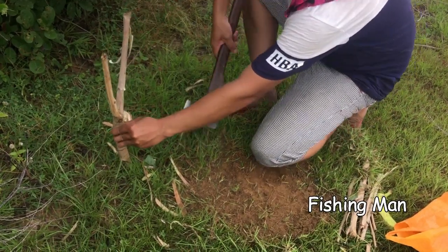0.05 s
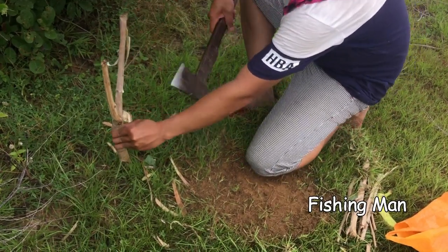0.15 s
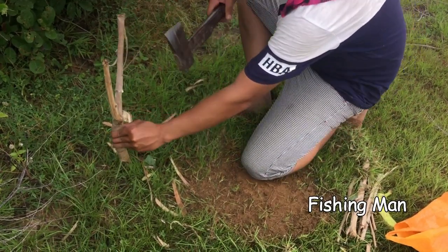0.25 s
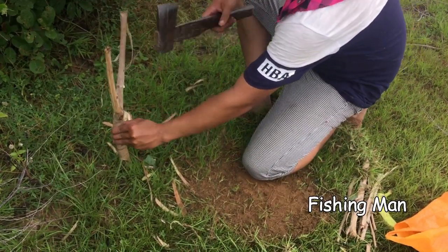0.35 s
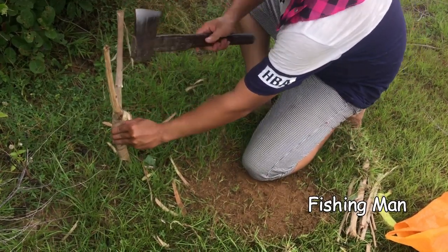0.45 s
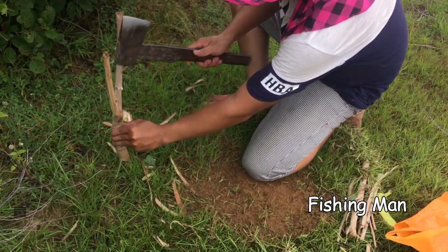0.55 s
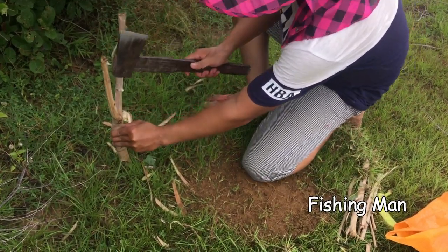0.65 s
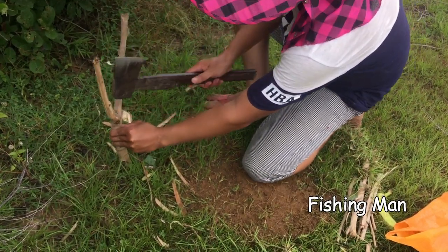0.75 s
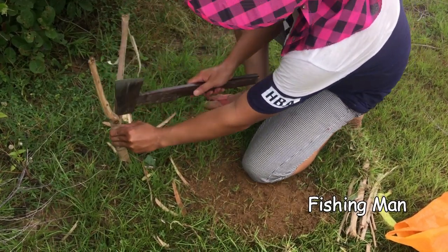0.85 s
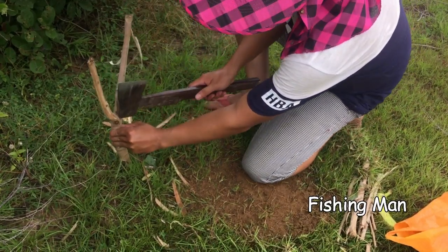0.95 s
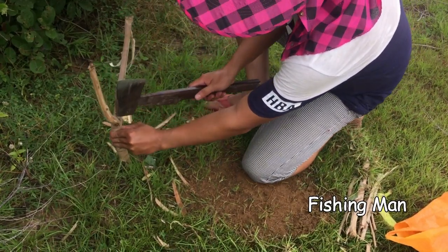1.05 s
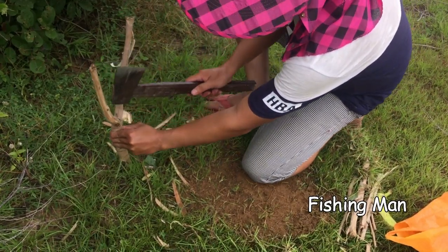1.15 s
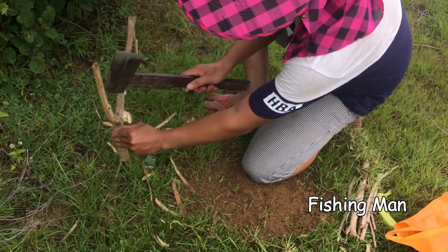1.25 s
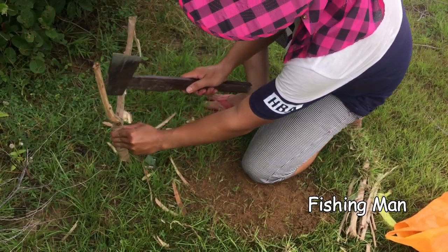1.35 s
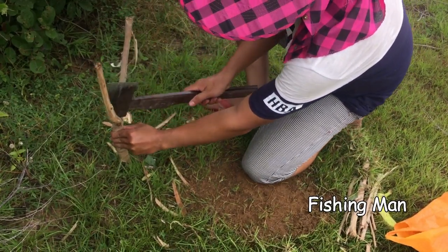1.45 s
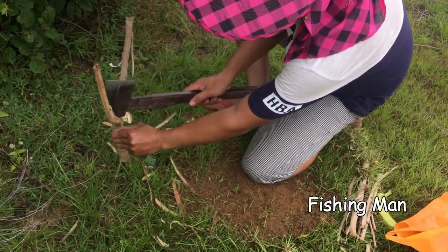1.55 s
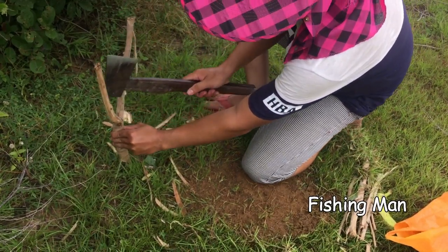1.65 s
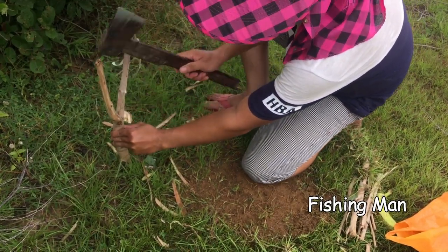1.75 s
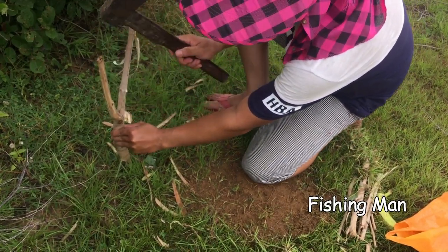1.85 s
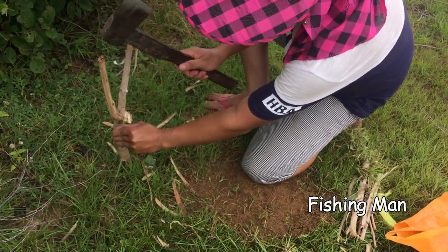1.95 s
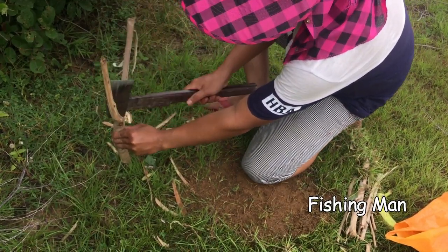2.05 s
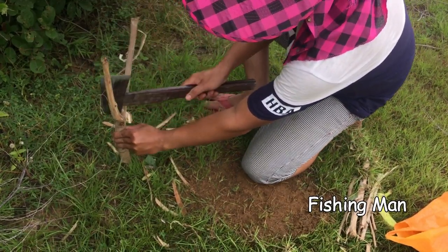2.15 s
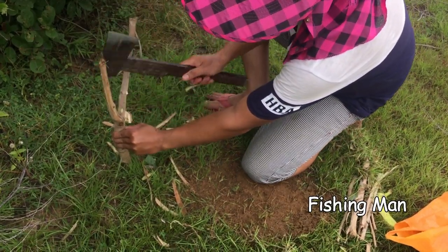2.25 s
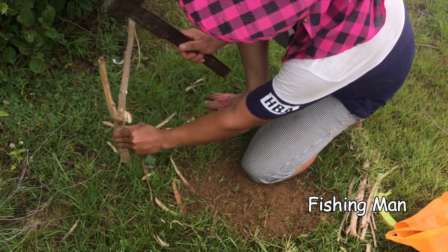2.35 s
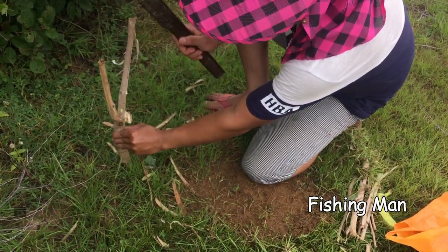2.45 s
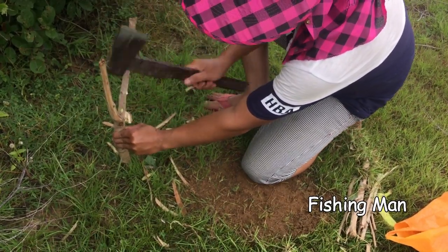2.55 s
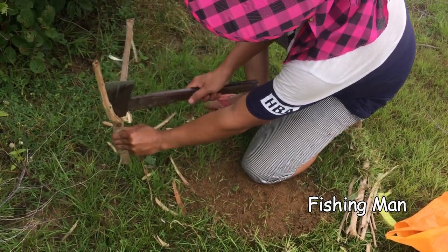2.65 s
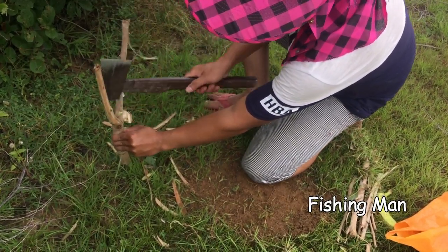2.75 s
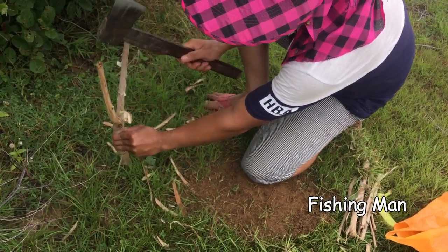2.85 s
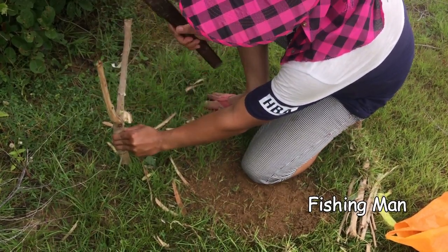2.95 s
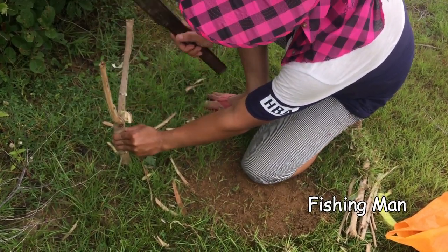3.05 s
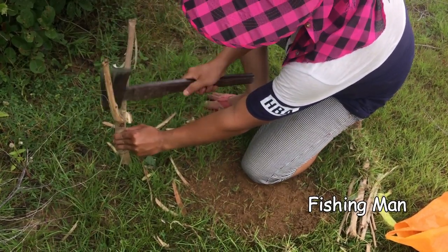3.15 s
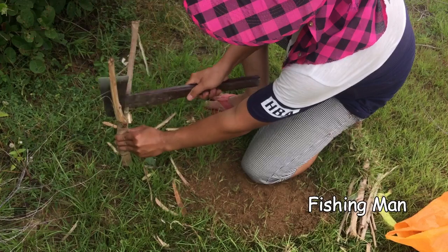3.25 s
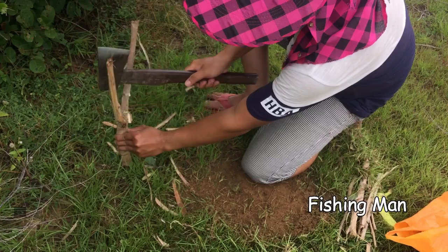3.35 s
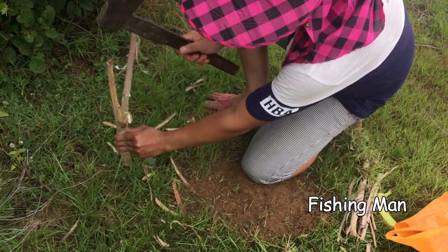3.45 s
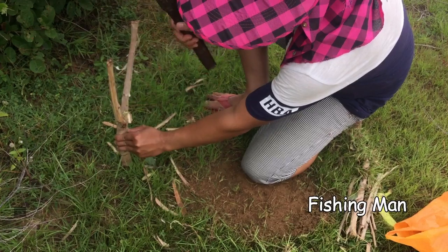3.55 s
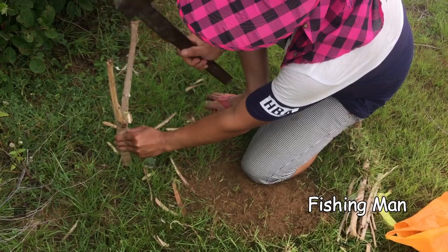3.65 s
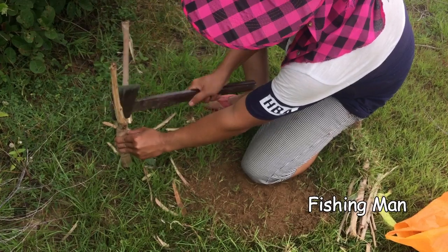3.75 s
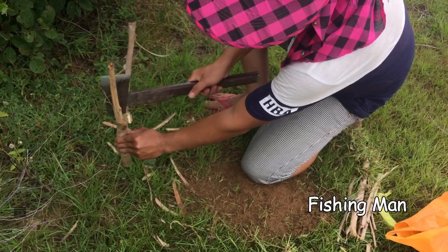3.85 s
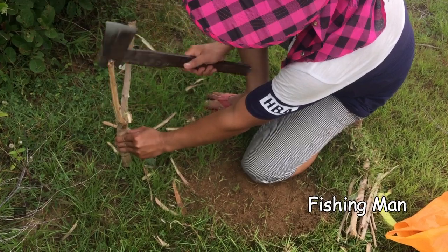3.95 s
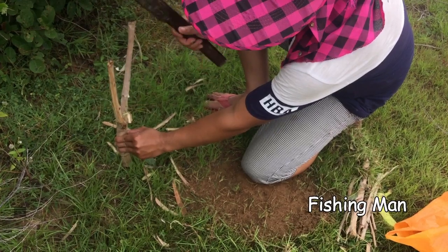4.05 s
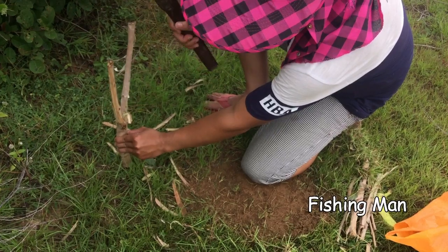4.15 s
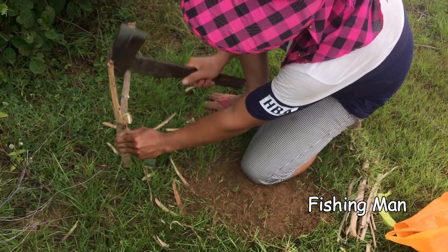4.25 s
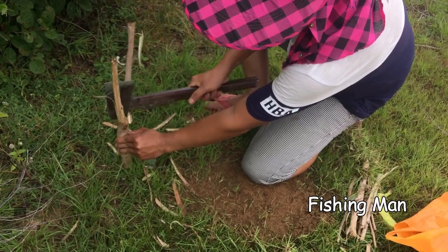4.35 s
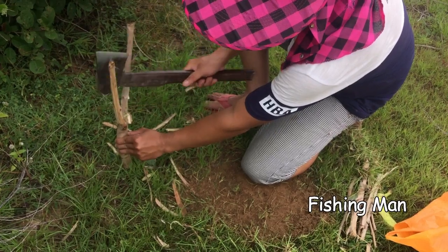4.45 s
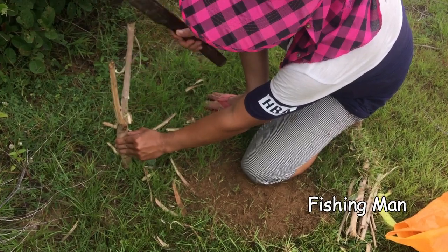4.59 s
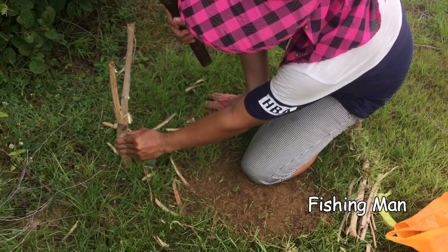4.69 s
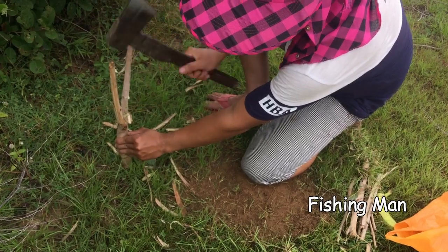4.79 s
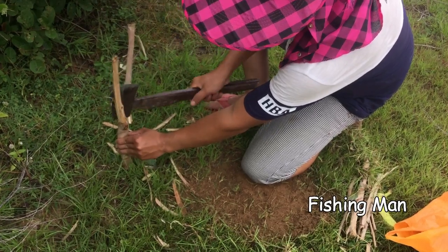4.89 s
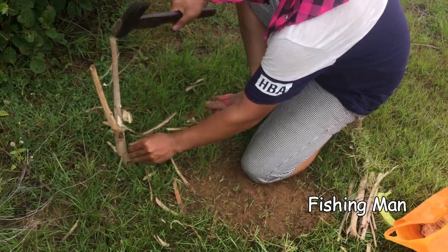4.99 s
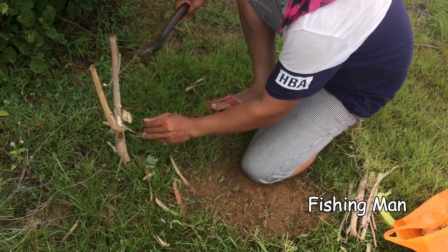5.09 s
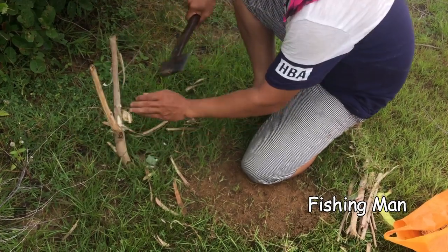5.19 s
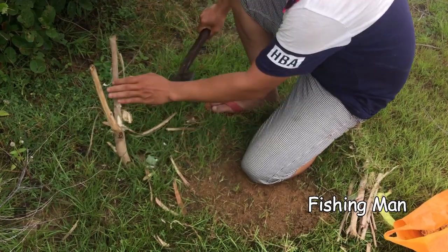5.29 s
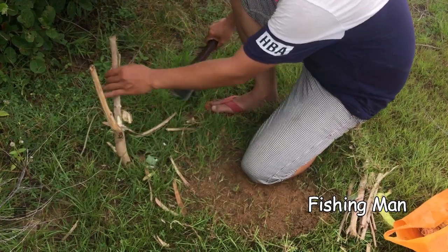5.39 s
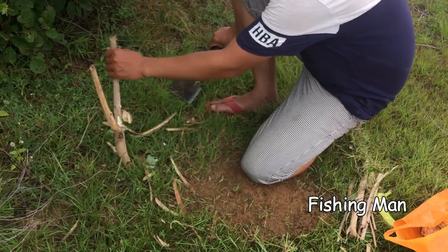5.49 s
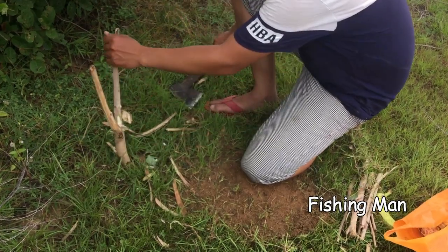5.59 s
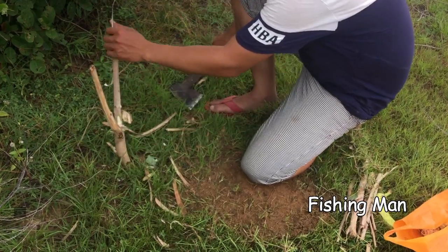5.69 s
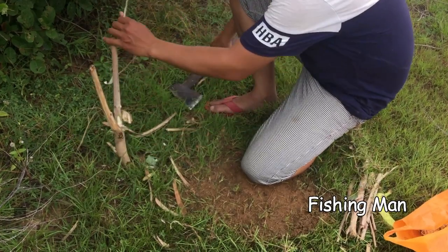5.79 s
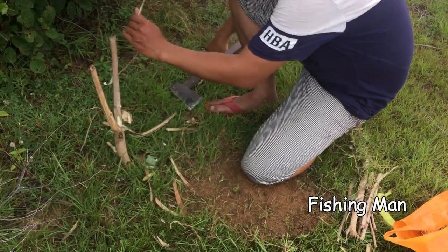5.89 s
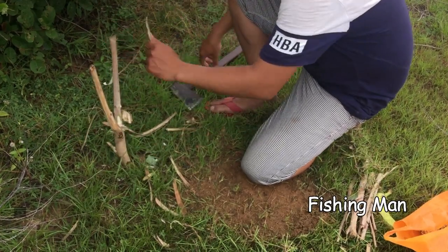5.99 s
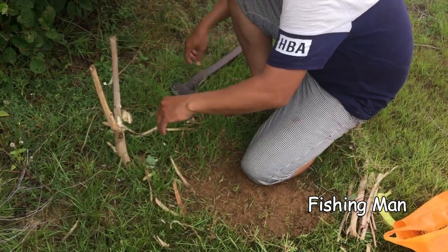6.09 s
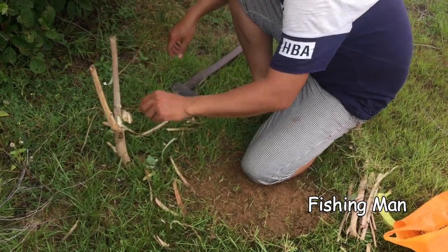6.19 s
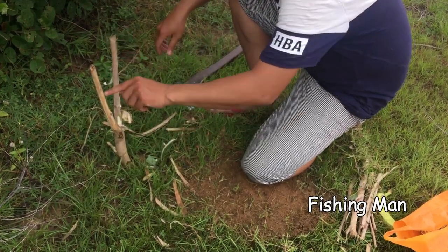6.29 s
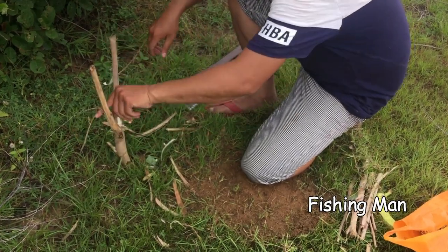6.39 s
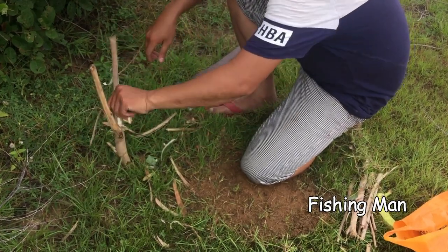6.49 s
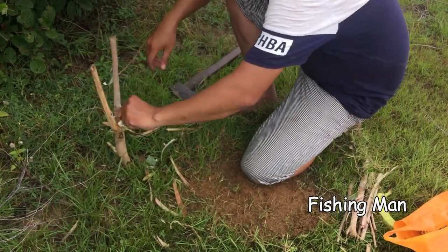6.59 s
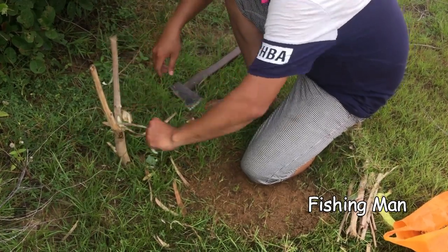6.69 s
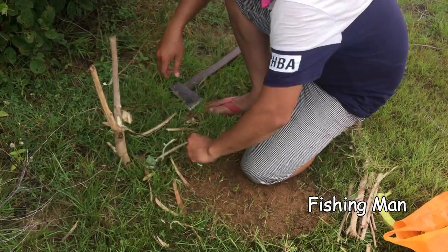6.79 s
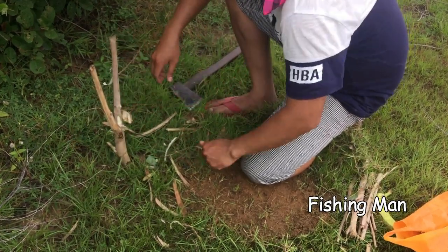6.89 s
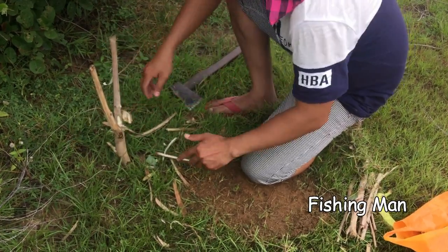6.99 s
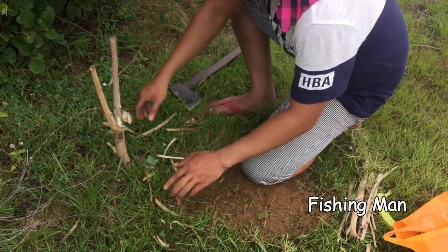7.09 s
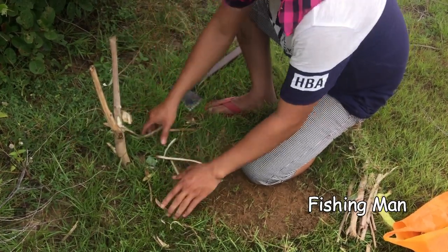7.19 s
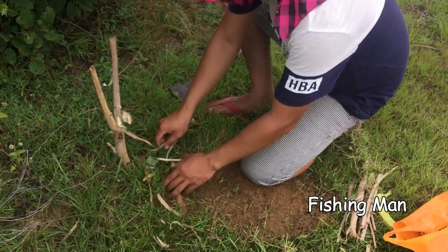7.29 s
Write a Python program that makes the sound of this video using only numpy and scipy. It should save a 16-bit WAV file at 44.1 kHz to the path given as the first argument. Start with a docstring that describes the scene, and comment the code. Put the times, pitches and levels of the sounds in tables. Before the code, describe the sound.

An open field heard through a small, close mono microphone, with a soft hush of distant leaves and a barely audible wavering drone. Wind pushes on the microphone throughout in uneven low thumps and flutter. In the first 0.5 seconds bark and grass scrape and twigs tick, one tick sharper near 0.4. Then a hatchet chops a thin green stake seven times at a steady pace: a weak tap at 1.5, then stronger blows at 2.1, 2.7, 3.2, 3.8, 4.4 and 4.9. Each is a bright, very short steel ring with a woody knock, splintering crack, low thud into soil and a brief scatter of chips; later blows knock harder. A bare click and rustle follow at 5.0. Faint raspy bird notes come from 5.2 to 5.9, with a big gust at 5.8. Dry grass crackles around 6.7, and rustling and wind return near 7.2.

```python
"""Wind slaps a small microphone while grass and bark rustle and twigs tick; then seven hatchet chops ring out.
Place: open fields with a soft hush and a faint drone; a thin green stake stands upright in grass, close by.
Wind, hush and drone are shaped noise, and single gusts are short low waves; rustles are clumped snaps.
A small bird's notes are sagging sines; ticks and a click are short pings with noise.
Each chop sums dying steel and stake modes with a thud and noise bursts.
"""
import sys
import numpy as np
from scipy import signal
from scipy.fft import rfft, irfft, next_fast_len
from scipy.io import wavfile
from scipy.ndimage import uniform_filter1d

SR = 44100
rng = np.random.default_rng(int(sys.argv[2]) if len(sys.argv) > 2 else 0)


def put_to_file(sound):
    """Save the sound as 16-bit audio at rate SR, in the file named by the first command-line argument."""
    columns = np.atleast_2d(sound).T  # one column per channel
    safe = np.clip(columns, -1, 1)
    whole_steps = np.round(safe * 32767)
    wavfile.write(sys.argv[1], SR, whole_steps.astype(np.int16))


N = 323253  # samples


def gain_of(db):
    """Decibels to gain."""
    return 10 ** (np.asarray(db) / 20)


def evened(x):
    """Scales to rms 1."""
    return x / np.sqrt(np.mean(x ** 2) + 1e-20)


def noise(size):
    """White noise."""
    return rng.standard_normal(size)


def smoothed(x, size):
    """Running mean over size samples, brought to rms 1."""
    return evened(uniform_filter1d(x, size))


def lumps(width_s):
    """Slow chance of rms 1 that holds for about width_s."""
    size = max(round(width_s * SR), 2)
    return smoothed(uniform_filter1d(noise(N), size), size)


def coloured(x, spectrum):
    """Filters x by a curve of (f/Hz, level/dB), straight over log frequency, and brings it to rms 1."""
    f, db = np.transpose(spectrum)
    size = next_fast_len(len(x))
    hz = np.fft.rfftfreq(size, 1 / SR)
    curve_db = np.interp(np.log(hz + 1), np.log(f + 1), db)
    return evened(irfft(rfft(x, size) * gain_of(curve_db), size)[:len(x)])


def level_over_time(table):
    """Joins points of (t/s, level/dB) by straight lines over the whole scene."""
    s, db = np.transpose(table)
    return np.interp(np.arange(N) / SR, s, db)


def add(mix, s, sound):
    """Mixes a sound in at s seconds."""
    part = mix[round(s * SR):][:len(sound)]
    part += sound[:len(part)]


# level of the faint far drone as it comes and goes: [t/s, level/dB]
DRONE_LEVEL = [(0, -76), (.4, -82), (1.0, -73), (1.499, -70), (2.0, -81.5), (3.0, -80), (3.8, -75),
               (4.7, -76.5), (5.2, -85.5), (7.33, -100)]
# narrow band of the drone: [f/Hz, relative level/dB per Hz]
DRONE_SPECTRUM = [(1400, -39.5), (1620, 1), (1720, 0), (1820, -6), (2100, -40)]


def drone():
    """A far, narrow, wavering band of noise."""
    wavering_db = level_over_time(DRONE_LEVEL) + 1.3 * lumps(0.11)
    return gain_of(wavering_db) * coloured(noise(N), DRONE_SPECTRUM)


# spectrum of distant leaves and fields: [f/Hz, relative level/dB per Hz]
HUSH_SPECTRUM = [(150, -28.5), (250, -3), (622, -3), (768, -7.5), (1170, -7.5), (4060, -19), (4840, -22),
                 (5870, -21), (8780, -25), (10500, -28), (13400, -25.5), (15700, -30), (16500, -47.5)]
# level of the hush: [t/s, rms level/dB]
HUSH_LEVELS = [(0, -59.5), (.6, -64.5), (1.3, -63.5), (3.8, -64), (5.3, -65.5), (7.33, -66.5)]


def hush():
    """The steady wash of distant leaves and fields: noise whose level drifts slowly."""
    wash = coloured(noise(N), HUSH_SPECTRUM)
    low_cut = signal.butter(2, 250, "high", fs=SR, output="sos")  # the wind owns the bass
    return gain_of(level_over_time(HUSH_LEVELS)) * evened(signal.sosfilt(low_cut, wash))


# single gusts that slap the microphone: [t/s, peak level/dB, nominal f/Hz]
GUSTS = [(0.136, -39, 70), (0.368, -33.5, 71), (0.464, -27, 122), (0.554, -39, 105), (0.625, -39, 93.5),
         (0.731, -26.5, 65), (0.792, -24.5, 73), (0.882, -27.5, 108), (0.908, -28, 204), (0.968, -29, 112),
         (1.038, -27.5, 107), (1.108, -29, 61), (1.214, -33, 129), (1.402, -29, 95), (1.454, -32, 75),
         (1.574, -26.5, 69), (1.697, -33.5, 72.4), (1.88, -27.5, 83.4), (1.999, -36, 65), (2.17, -32, 85),
         (2.396, -35, 71), (2.772, -46, 69.3), (2.854, -30, 72.4), (2.945, -35, 65.2), (3.011, -26.5, 99),
         (3.153, -20.5, 84), (3.338, -23, 102), (3.409, -38, 70.5), (3.492, -22, 128), (3.607, -32, 112),
         (3.682, -28, 119.6), (3.725, -34, 72.7), (3.912, -28.5, 59.5), (4.03, -31, 73), (4.144, -27, 218),
         (4.198, -24, 96), (4.253, -34, 87), (4.484, -24, 137), (4.565, -25, 63.9), (4.697, -32, 96.6),
         (4.819, -27, 102), (4.858, -31, 81), (5.012, -31, 76.5), (5.167, -33.5, 86.3),
         (5.258, -39.5, 65.4), (5.4, -29, 164), (5.445, -23, 80), (5.546, -33.5, 143), (5.798, -20.5, 79),
         (6.201, -48, 71.7), (6.497, -34, 80), (6.606, -28.5, 92.4), (7.157, -27.5, 110.5),
         (7.222, -38.5, 71), (7.278, -35.5, 83.6)]


def buffet(db, hz):
    """A push of air on the microphone: about two low cycles that slow down as they fade."""
    turns = np.arange(0, 2.6, hz / SR)
    shape = (1 - np.exp(-turns / 0.2)) ** 2 * np.exp(-turns / 0.74)
    shape = shape * signal.windows.tukey(len(turns), .25)
    direction = rng.choice([-1, 1])
    return gain_of(db) * direction * np.sin(2 * np.pi * turns ** 0.95) * shape / shape.max()


# wind under the single gusts: [t/s, rumble level/dB, added flutter level/dB]
WIND_STRENGTH = [(0.0, -24.5, -0.5), (0.08, -55, -5), (0.24, -34.5, 3), (0.3, -58.5, 8), (0.47, -39.5, 1.5),
                 (0.62, -30.5, -6.5), (0.7, -45, 2.5), (1.0, -33.5, -1), (1.2, -41, -2.5),
                 (1.29, -49.5, -4), (1.42, -29, -10), (1.65, -43.5, -2), (1.9, -35.5, 2.5), (1.96, -53, -4),
                 (2.03, -35.5, -8.5), (2.25, -45, 2.5), (2.33, -54, 4), (2.43, -34, -4), (2.55, -54, 2),
                 (3.02, -38.5, -1), (3.12, -46.5, -8), (3.3, -46.5, 0.5), (3.5, -36, 0.5),
                 (3.9, -44.5, 3.5), (4.33, -45.5, 2.5), (4.57, -38, -0.5), (4.92, -35, -1),
                 (5.12, -50, -1.5), (5.36, -49, -2.5), (5.5, -40.5, 7.5), (5.69, -57, 1), (5.78, -41, -2.5),
                 (5.9, -58.5, 0), (6.35, -49, -7.5), (6.45, -50, -6.5), (7.1, -46.5, -4.5),
                 (7.33, -37, -1.5)]
# low rumble of wind at the microphone: [f/Hz, relative level/dB per Hz]
RUMBLE_SPECTRUM = [(12, -58), (20, -20), (41, 2), (65, 5.5), (119, -1.5), (250, -24.5), (320, -48),
                   (550, -120)]
# higher flutter, also the colour of shaken soil: [f/Hz, relative level/dB per Hz]
FLUTTER_SPECTRUM = [(80, -31), (130, 0), (200, 0), (300, -6.5), (450, -21), (700, -62)]
FLUTTER_DB, FLUTTER_FOLLOW = -58.5, 1.4  # flutter at a rumble of -45 dB, and dB of flutter per dB of rumble
STIR_RISE_S, STIR_T60_S = 0.0044, 0.18
STIR_RUMBLE_DB, STIR_FLUTTER_DB = -7.5, -15  # against the gust's peak
STIR_DB_PER_OCTAVE = 6.5  # higher gusts flutter more


def wind():
    """Lumpy low noise; quick eddies add a higher flutter, and each gust stirs both with dying turbulence."""
    s, *columns = np.transpose(WIND_STRENGTH)
    strength_db, bright_db = (np.interp(np.arange(N) / SR, s, c) for c in columns)
    rumble_gain = gain_of(strength_db)
    flutter_gain = gain_of(FLUTTER_DB + FLUTTER_FOLLOW * (strength_db + 45))
    t = np.arange(SR // 3) / SR
    stir = np.minimum(t / STIR_RISE_S, 1) * gain_of(-60 * t / STIR_T60_S)
    for start, peak_db, hz in GUSTS:
        pitch_db = STIR_DB_PER_OCTAVE * np.log2(hz / 100)
        add(rumble_gain, start, gain_of(peak_db + STIR_RUMBLE_DB) * stir)
        add(flutter_gain, start, gain_of(peak_db + STIR_FLUTTER_DB + pitch_db) * stir)
    eddies = lumps(0.012)
    rumble = evened(coloured(noise(N), RUMBLE_SPECTRUM) * gain_of(4.2 * eddies))
    flutter = coloured(noise(N) * gain_of(5.3 * eddies), FLUTTER_SPECTRUM)
    return rumble_gain * rumble + gain_of(bright_db) * flutter_gain * flutter


# bird notes: [t/s, nominal peak level/dB, mid-note f/Hz, length/s, fall as a share of pitch]
BIRD_NOTES = [(5.228, -71, 5130, 0.028, .01), (5.24, -67.5, 3410, 0.058, 0.0089),
              (5.258, -69, 5670, 0.04, 0.011), (5.30, -70.5, 5070, 0.017, .01),
              (5.357, -69.5, 3420, 0.043, 0.0093), (5.39, -66, 2540, 0.017, .01),
              (5.453, -61, 4800, 0.034, 0.017), (5.4755, -59, 4760, 0.048, 0.03),
              (5.646, -58.5, 4570, 0.035, 0.049), (5.669, -55, 4520, 0.031, 0.038),
              (5.693, -56.5, 4460, 0.025, 0.06), (5.855, -61.5, 4580, 0.032, 0.041),
              (5.877, -58.5, 4520, 0.04, 0.07), (5.902, -66, 4640, 0.033, 0.031)]


def chirp(db, hz, length, fall):
    """A short raspy note: a sagging sine with a wobble in pitch and level."""
    t = np.arange(0, max(length, .005), 1 / SR)
    wobble, rasp = (smoothed(noise(len(t)), 50) for _ in range(2))
    slide = hz * (1 + fall * (.5 - t / t[-1] + 0.48 * wobble))
    swell = np.sin(np.pi * np.sqrt(t / t[-1])) ** 2  # rises faster than it falls
    return gain_of(db) * np.sin(2 * np.pi * np.cumsum(slide) / SR) * (1 + .5 * rasp) * swell


# hands and feet in grass and bark: [t/s, swell/s, fade/s, scrape level/dB, dry hiss level/dB]
RUSTLE_STROKES = [(0.0, 0.0059, 0.029, -81, -86), (0.03, 0.096, 0.028, -52.5, -66),
                  (0.12, 0.1, .09, -50, -60), (0.37, 0.01, 0.031, -54.5, -78),
                  (0.82, 0.059, 0.042, -65, -76), (4.99, 0.081, 0.075, -54.5, -62),
                  (5.37, 0.059, 0.075, -64, -61.5), (5.47, .11, .25, -75, -68.5),
                  (5.6, .23, 0.16, -72, -67), (6.56, 0.099, 0.086, -81, -62.5),
                  (6.678, 0.022, .014, -69.5, -51), (6.708, .011, 0.013, -77, -44.5),
                  (7.19, 0.14, 0.038, -64.5, -59)]
# scraped stalks and bark: [f/Hz, relative level/dB per Hz]
SCRAPE_SPECTRUM = [(600, -52), (1000, 5.5), (2500, 13.5), (4000, 11), (6000, -4), (9000, -55)]
# dry blades: [f/Hz, relative level/dB per Hz]
DRY_SPECTRUM = [(2500, -21), (5000, -0.5), (7500, 3.5), (10500, 1.5), (13500, 3.5), (16500, -2.5)]
RUSTLE_DEPTH_DB = 18.5  # how far below its peak the stroke starts and ends, before the edges are tapered
SNAPS_PER_S = 300  # mean rate at each pitch


def rustle(swell, fade, scrape_db, dry_db):
    """Small pitched snaps in clumps for the scrape, a finer grain for the dry blades."""
    t = np.arange(0, swell + fade, 1 / SR)
    size = len(t)
    stroke = gain_of(np.interp(t, [0, swell, swell + fade], [-RUSTLE_DEPTH_DB, 0, -RUSTLE_DEPTH_DB]))
    fine = noise(size)
    grain_t = np.arange(SR // 100) / SR
    clumps = smoothed(noise(size), 250)
    snaps = 0.18 * fine
    for hz in np.geomspace(900, 5500, num=14):  # each stalk or flake of bark snaps at its own pitch
        strength = gain_of(0.96 * np.minimum(rng.exponential(1, size), 4))
        strikes = strength * (rng.random(size) < SNAPS_PER_S / SR)
        grain = np.sin(2 * np.pi * hz * grain_t) * np.exp(-grain_t * hz / 0.88)
        snaps = snaps + signal.oaconvolve(strikes, grain)[:size] * np.sqrt(hz / SR)
    scrape = coloured(snaps * gain_of(2.5 * clumps), SCRAPE_SPECTRUM)
    dry_hiss = coloured(fine * gain_of(1.5 * clumps), DRY_SPECTRUM)
    mixed = gain_of(scrape_db) * scrape + gain_of(dry_db) * dry_hiss
    return mixed * stroke * signal.windows.tukey(size, .3)


# short ticks of twigs and landing chips, except the one at 4.98 s, which is heard as a bare click:
# [t/s, ping level/dB, ping f/Hz, snap level/dB, t60/s]
TICKS_AND_CLICK = [(0.0473, -48, 1070, -76, 0.023), (0.121, -45, 1100, -53, 0.019),
                   (0.1281, -42.5, 1050, -64, 0.034), (0.1955, -53, 2850, -52, 0.011),
                   (0.3594, -50, 2020, -53, 0.011), (0.281, -66, 2000, -53, 0.008),
                   (0.3818, -30.5, 1710, -39.5, 0.0057), (0.8723, -56, 1340, -65, 0.01),
                   (0.9105, -66, 902, -53, 0.01), (2.6912, -42, 1680, -44.5, 0.008),
                   (3.6857, -58, 1110, -70, 0.01), (3.8297, -47.5, 2820, -58, 0.012),
                   (4.3904, -32.5, 890, -46.5, 0.0051), (4.487, -49.5, 935, -68.5, 0.01),
                   (4.9823, -40.5, 1058, -47.5, 0.007), (5.4335, -46.5, 2900, -43, 0.026),
                   (6.6921, -48, 1906, -39.5, 0.0087), (6.7196, -67, 1096, -46.5, 0.0085),
                   (6.7617, -54, 1280, -57, 0.016)]
# noise of the snap: [f/Hz, relative level/dB per Hz]
SNAP_SPECTRUM = [(500, -23.5), (1500, -10.5), (4000, -0.5), (8000, 1.5), (11000, -10), (16500, 0)]


def tick(db, hz, snap_db, t60):
    """A short ping with a wide snap of noise, both dying together."""
    t = np.arange(SR // 30) / SR
    ping = gain_of(db) * np.sin(2 * np.pi * hz * t)
    snap = gain_of(snap_db) * coloured(noise(len(t)), SNAP_SPECTRUM)
    return (ping + snap) * gain_of(-60 * t / max(t60, .002))


def ring(modes, t, length, cycles, favoured_hz, slope_db, snap):
    """Dying modes; each swells over some cycles, highs first, and loses a share at once while the edge is gripped."""
    out = np.zeros(len(t))
    for hz, db, t60 in modes:
        luck_db, detune = 1.5 * noise(None), 0.0078 * noise(None)
        reach_db = db + luck_db - slope_db * np.log2(hz / favoured_hz) ** 2
        swell = (1 - np.exp(-t * hz / cycles)) ** 2
        gripped = 1 + snap * np.exp(-t / 0.00055)
        fade = gain_of(reach_db - 60 * t / (t60 * length))
        out += fade * swell * gripped * np.sin(2 * np.pi * hz * (1 + detune) * t)
    return out / abs(out).max()


# steel meeting wood in seven chops; in four the edge bites and then the head seats: [t/s,
# steel ring peak level/dB, steel ring length factor, f/Hz the ring favours, wood knock peak level/dB,
# f/Hz the knock favours, thud level/dB, thud settling f/Hz, crack level/dB, scatter level/dB]
HATCHET_CONTACTS = [(1.509, -32, 1.5, 4640, -47, 2000, -27, 170, -29.5, -52),
                    (2.1086, -14, 0.76, 4900, -18, 1800, -20, 228, -22, -40.5),
                    (2.6597, -23, 1.6, 4640, -29.5, 2000, -40.5, 198, -28, -69),
                    (2.6636, -7, 0.52, 4500, -15, 2170, -14.5, 205, -20, -39.5),
                    (3.2375, -16, .6, 4300, -14, 1580, -13.5, 210, -24, -43.5),
                    (3.8006, -12, 0.94, 6200, -47, 2500, -35.5, 156, -23, -49),
                    (3.8036, -10, 0.47, 4800, -7.5, 1480, -19, 164.3, -28, -39),
                    (4.3578, -6.5, 0.79, 5380, -26.5, 2800, -38.5, 162, -22, -51.5),
                    (4.3610, -11.5, 0.76, 4600, -5, 1580, -18.5, 165, -29, -38),
                    (4.9088, -5, 0.53, 4100, -5.5, 2400, -36, 120, -22.5, -47),
                    (4.9100, -17.5, 1.2, 4200, -7, 980, -12, 117, -32.5, -41.5)]
# modes of the hatchet head: [nominal f/Hz, relative level/dB, t60/s before the ring length factor]
STEEL_MODES = [(3300, -3.5, 0.024), (3740, -3.5, 0.028), (4350, -2, 0.018), (4606, -5, 0.038),
               (5247, -0.5, 0.015), (6180, -2, 0.022), (6730, -8, 0.026)]
# modes of the stake: [nominal f/Hz, relative level/dB, t60/s before shortening]
STAKE_MODES = [(408, 4.5, 0.028), (500, -8, 0.067), (645, -8, 0.044), (852, -8, 0.024), (1186, -6.5, 0.016),
               (1454, -0.5, 0.025), (1890, -8, 0.019), (2000, -2.5, 0.019), (2292, -3, 0.019),
               (2714, 5, 0.0068), (3106, -3.5, 0.017)]
# tearing fibres: [f/Hz, relative level/dB]
SPLINTER_SPECTRUM = [(300, -15.5), (1000, -0.5), (3000, -7), (6500, -10.5), (8500, -8.5), (12000, -10.5),
                     (16000, -13.5)]
# chips and bushes: [f/Hz, relative level/dB]
SCATTER_SPECTRUM = [(300, -3), (700, 5.5), (1500, 0.5), (3000, -4), (6500, -9), (8500, -16), (12000, -16.5),
                    (16000, -19)]
SOIL_DB, SOIL_T60_S = -6.5, .12  # loose soil shaken by the thud, against the thud


def chop(steel_db, steel_length, steel_hz, wood_db, wood_hz, thud_db, thud_hz, crack_db, scatter_db):
    """Steel rings at once, the stake swells after it, and the ground answers last."""
    t = np.arange(SR // 4) / SR
    size = len(t)
    late = np.maximum(t - .0012, 0)
    # bending waves: the highs arrive first, so the thud falls in pitch
    turns = thud_hz * (late + 1.5 * .006 * (1 - np.exp(-late / 0.0054)))
    thud = np.sin(2 * np.pi * turns) * (1 - np.exp(-late / 0.005)) * gain_of(-60 * late / 0.045)
    soil_fade = (1 - np.exp(-late / 0.003)) * gain_of(SOIL_DB - 60 * late / SOIL_T60_S)
    soil = coloured(noise(size), FLUTTER_SPECTRUM) * soil_fade
    crack_fade = gain_of(-60 * t / 0.021) * (1 - np.exp(-t / 0.00066))
    crack = coloured(noise(size), SPLINTER_SPECTRUM) * crack_fade
    # chips patter unevenly while the bushes send a fading blur back
    patter = gain_of(2.5 * smoothed(noise(size), 90))
    fade = (gain_of(-60 * t / 0.11) + gain_of(-16 - 60 * t / 0.4)) * (1 - np.exp(-t / .002))
    scatter = coloured(noise(size), SCATTER_SPECTRUM) * patter * fade
    steel = ring(STEEL_MODES, t, np.clip(steel_length, .1, 3), cycles=0.9,
                 favoured_hz=steel_hz, slope_db=14.0, snap=2.1)
    wood = ring(STAKE_MODES, t, 0.88, cycles=0.94, favoured_hz=wood_hz, slope_db=2.3, snap=0.2)
    return (gain_of(steel_db) * steel + gain_of(wood_db) * wood + gain_of(thud_db) * (thud + soil)
            + gain_of(crack_db) * crack + gain_of(scatter_db) * scatter)


def scene():
    """Everything in one channel, from the far background to the close hatchet."""
    mix = drone() + hush() + wind()
    events = ((GUSTS, buffet), (BIRD_NOTES, chirp), (RUSTLE_STROKES, rustle),
              (TICKS_AND_CLICK, tick), (HATCHET_CONTACTS, chop))
    for table, source in events:
        for s, *row in table:
            add(mix, s, source(*row))
    return mix[None]


def record(dry):
    """The small microphone thins the deepest bass; then the treble is cut off at the band limit."""
    thinned = signal.sosfilt(signal.butter(2, 42, "high", fs=SR, output="sos"), dry)
    band_limit = signal.firwin(161, 16100, window=("kaiser", 8), fs=SR)  # Hz
    return signal.oaconvolve(thinned, band_limit[None], "same")


dry = scene()
out = record(dry)
put_to_file(out)
```